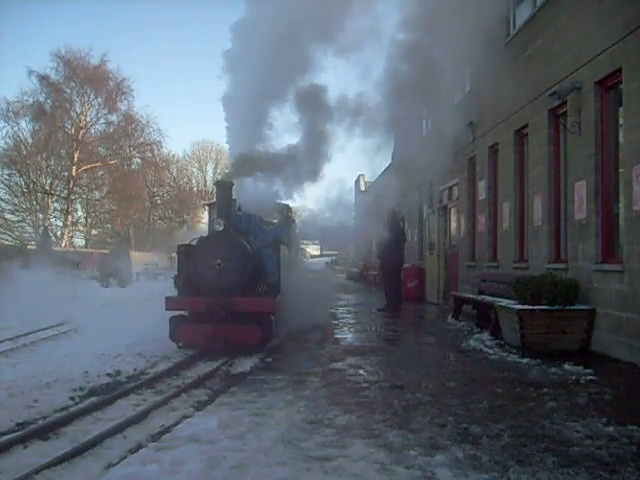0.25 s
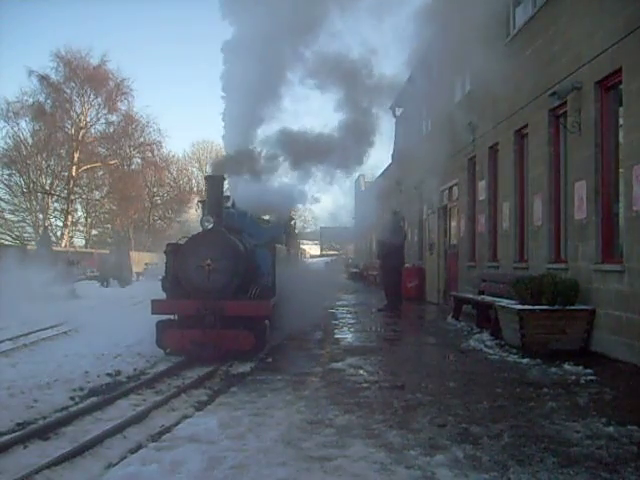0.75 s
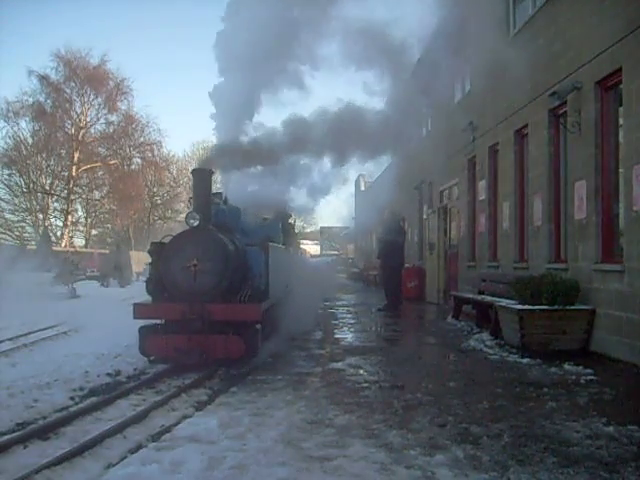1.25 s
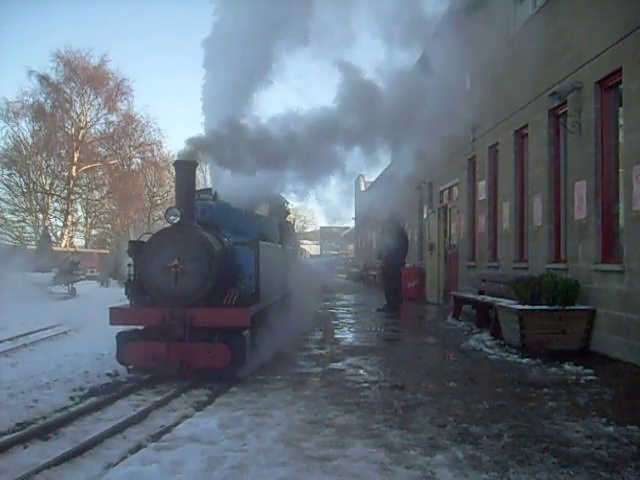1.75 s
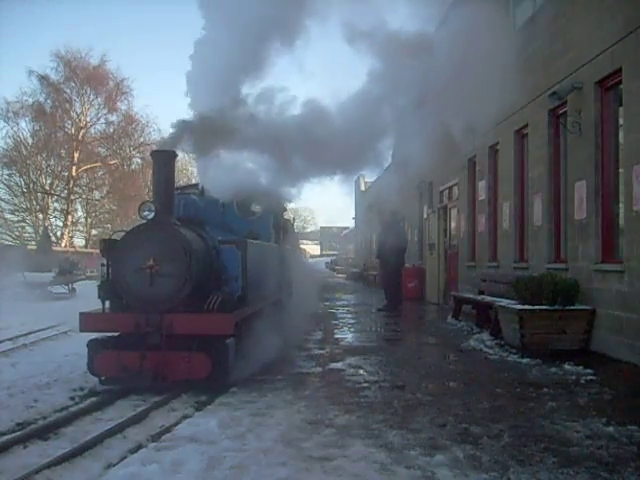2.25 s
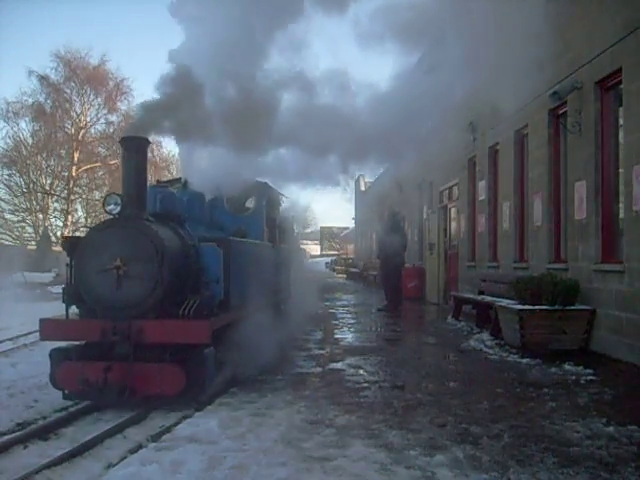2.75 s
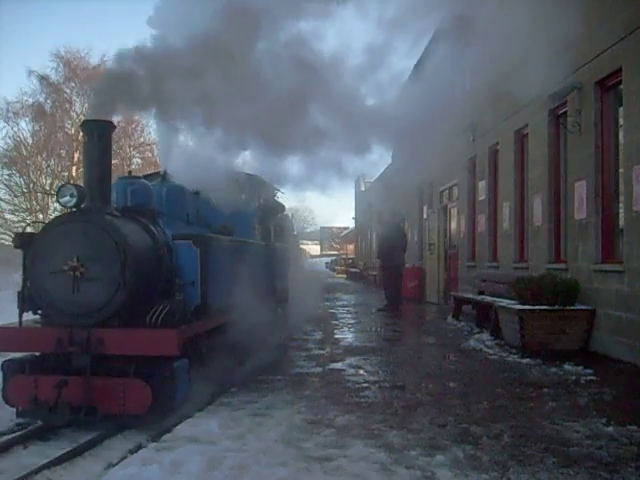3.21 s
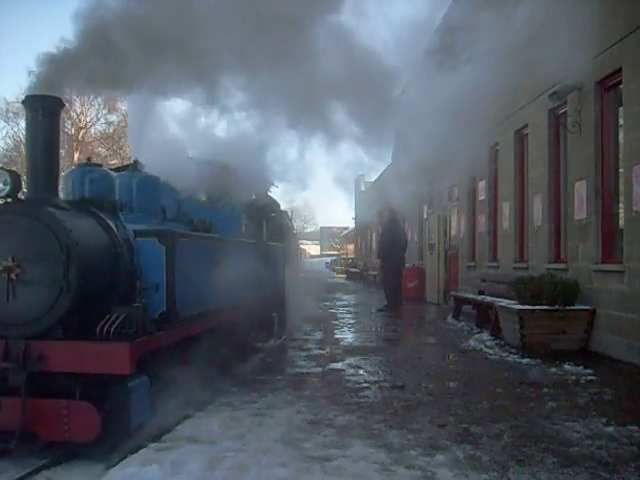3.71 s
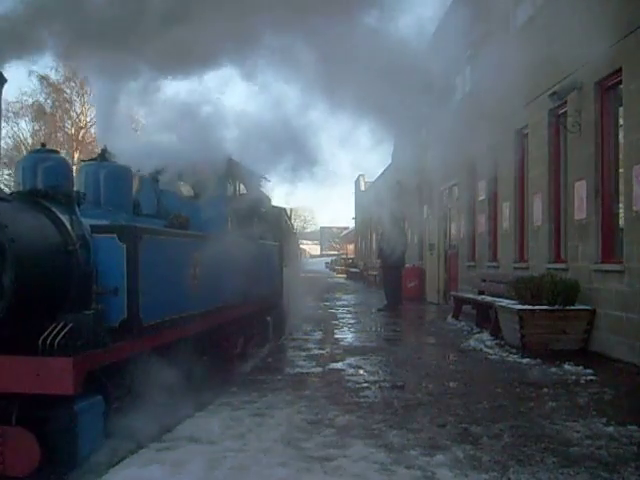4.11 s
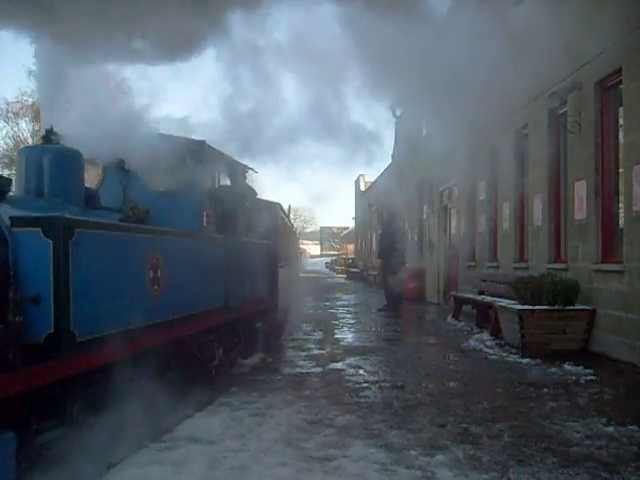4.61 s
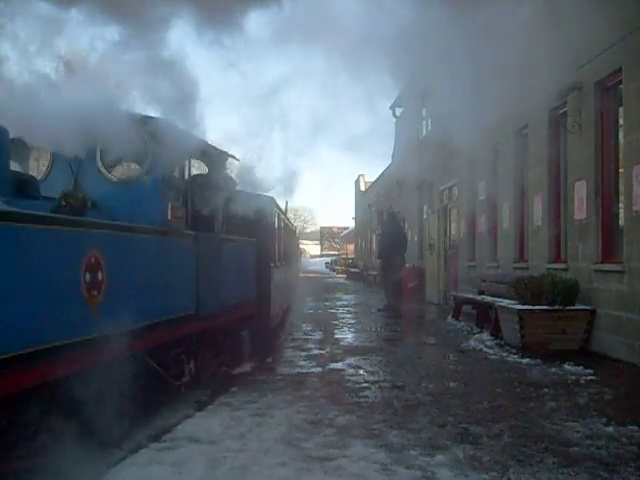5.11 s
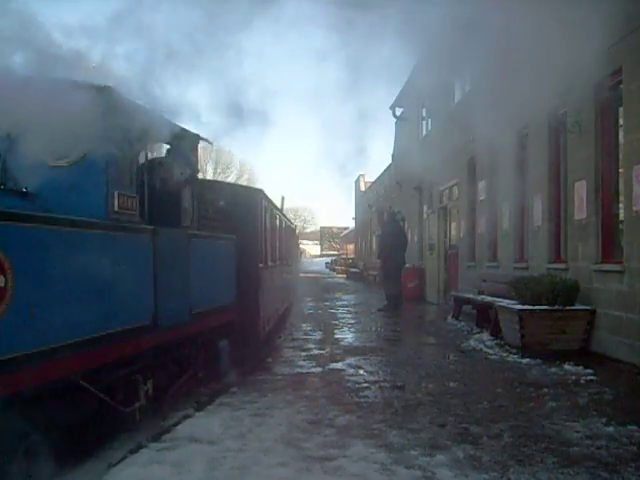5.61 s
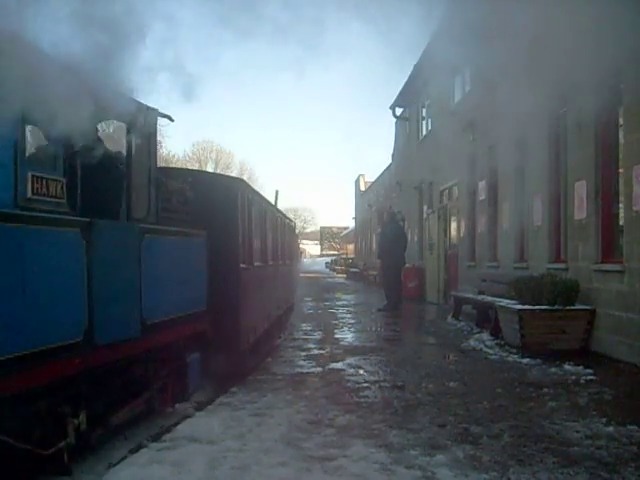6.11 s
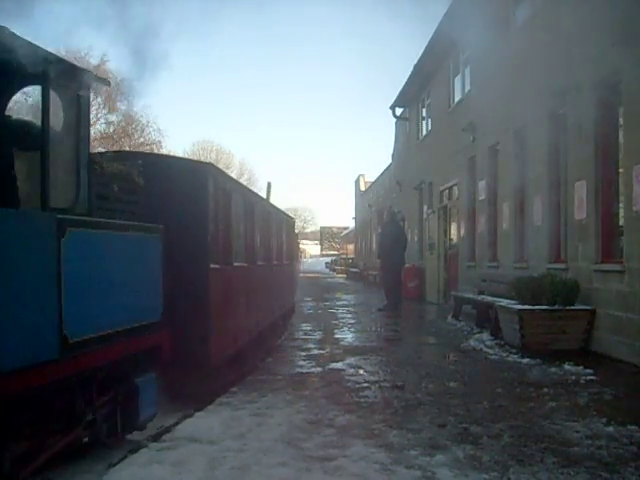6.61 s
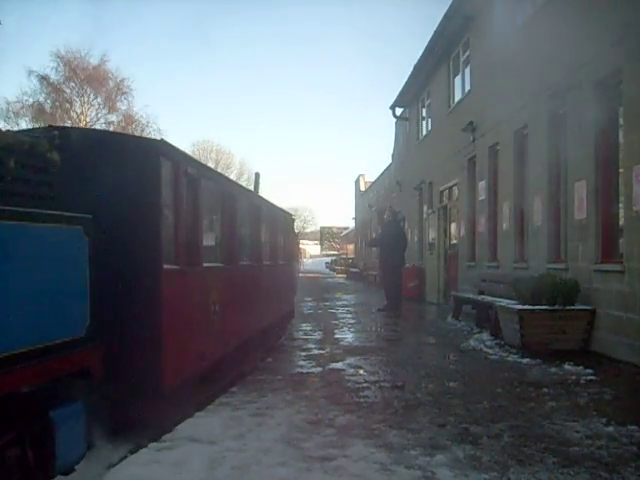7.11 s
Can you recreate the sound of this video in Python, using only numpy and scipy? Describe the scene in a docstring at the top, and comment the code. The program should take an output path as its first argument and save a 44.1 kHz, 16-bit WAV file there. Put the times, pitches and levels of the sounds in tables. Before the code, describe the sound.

Steam roars from the safety valve of a small locomotive approaching along a station platform, a bright hiss with a rough, whistle-like ring. Light spitting puffs from the drain cocks come and go. As the engine draws closer, a low rolling rumble builds beneath occasional dull knocks and an iron clank. The hiss is loudest near the end, spluttering a little as it passes a few metres from the fixed microphone, which slightly overloads.

```python
"""Steam roars from the safety valve of a small locomotive, gathering speed past a station platform.
The microphone stands 3 m from the valve's path. The jet half whistles around one strong resonance,
and its moving reflections make the hiss phase. Drain cocks puff by the cylinders; underneath, the
wheels rumble and the running gear knocks. The microphone overloads a little on the loudest hiss."""
import sys
import numpy as np
from scipy import signal
from scipy.fft import rfft, irfft, next_fast_len
from scipy.io import wavfile
from scipy.ndimage import uniform_filter1d, map_coordinates

SR = 44100
rng = np.random.default_rng(int(sys.argv[2]) if len(sys.argv) > 2 else 0)


def log_audio(samples):
    """Write samples as a 16-bit WAV file to the path given in sys.argv[1]."""
    # one column per channel
    frames = np.atleast_2d(samples).T
    # limit to full scale, then quantise
    limited = np.clip(frames, -1, 1)
    pcm = np.round(limited * 32767).astype(np.int16)
    wavfile.write(sys.argv[1], SR, pcm)


N = 324334
TIME = np.arange(N) / SR
# The valve comes abreast of the microphone at ABREAST_S, SIDE_M away and moving at SPEED_M_S.
ABREAST_S, SIDE_M, SPEED_M_S, ACCEL_M_S2 = 6.22, 3, 2.83, .24
CYLINDERS_M, WHEELS_M = 1.7, -1.2  # ahead of the valve
SOUND_M_S = 343

# Strength of the valve's blow at the microphone. Each row: time in seconds, relative level in dB.
VALVE_BLOW = [(0, -21.5), (0.38, -18), (0.85, -20.5), (1.1, -19), (1.38, -21), (1.65, -18.5), (1.85, -15),
              (2.1, -16.0), (2.6, -17), (3.1, -18.5), (3.55, -17.5), (3.85, -18), (4.2, -15.5), (5.1, -13),
              (5.45, -14), (5.8, -12.5), (7.0, -11.5), (7.35, -11.5)]
# Spectrum of the valve's jet. Each row: frequency in Hz, relative level in dB.
JET_SPECTRUM = [(300, -43), (550, -31.5), (800, -28.5), (1050, -24), (1600, -13.5), (2150, -8.5),
                (2500, -3), (2770, 0), (3000, -2), (3500, -8.5), (4400, -14.5), (5400, -22.5),
                (8000, -29.5), (12000, -64)]
# Mirror images of the jet in the platform, the track bed and two parts of the station front.
# Each row: distance from the microphone to the image's path in metres, reflection strength in dB.
JET_IMAGES = [(4.13, -20.5), (4.92, -22), (7.56, -17), (8.66, -9)]
# Puffs from the drain cocks.
# Each row: middle in seconds, length in seconds, relative hiss in dB, relative spray in dB.
COCK_PUFFS = [(.55, 0.22, -37.5, -44), (1.17, 0.32, -38, -44.5), (1.527, 0.3, -38, -51),
              (1.9, 0.45, -39, -42.5), (2.3, 0.5, -49, -39), (2.736, 0.3, -34, -36), (2.96, .3, -35, -40.5),
              (3.54, 0.29, -34, -38), (4.032, 0.24, -34.5, -38.5), (4.88, 0.14, -40, -38.5),
              (5.25, 0.16, -38, -40), (5.68, .4, -40, -40.5), (6.2, 0.18, -44, -37.5),
              (6.73, 0.19, -41, -49)]
# Spectrum of the cocks' fine spray. Each row: frequency in Hz, relative level in dB.
SPRAY_SPECTRUM = [(7000, -13), (8600, -0.5), (9500, 3), (10300, 3), (11000, -4), (12000, -18)]
# Spectrum of wheels rolling on the track. Each row: frequency in Hz, relative level in dB.
RUMBLE_SPECTRUM = [(20, -15), (35, -9), (72, 3.5), (95, -3), (175, 2.5), (260, 1), (500, -1), (1200, -30.5)]
# A brief swell of rushing steam near 1 kHz, among low groans, booms and rings.
# Each row: middle in seconds, length in seconds, level in dB, centre in Hz, width in Hz.
BRIEF_SWELLS = [(2.0, 0.28, -52.5, 284, 100), (3.42, .2, -52, 335.7, 101), (3.82, 0.2, -48, 367, 110),
                (4.35, 0.67, -43, 1001, 300), (5.9, 0.21, -52, 109.5, 130), (5.8, .6, -48.5, 650, 35),
                (6.526, 0.11, -48, 339, 100), (7.03, .3, -52, 175, 100)]
# Knocks of rods and couplings. Each row: start in seconds, relative level in dB, ring pitch in Hz.
ROD_KNOCKS = [(1.329, -36.5, 323), (1.399, -31, 298), (3.137, -32, 337), (3.667, -27.5, 334),
              (3.839, -41, 420), (4.463, -32, 428), (4.536, -36, 360), (5.747, -33, 356), (5.881, -27, 314),
              (6.103, -32, 335), (6.847, -33, 270), (6.979, -33, 331)]
# Modes of the frame. Each row: multiple of the ring pitch, relative level in dB, seconds to fall 60 dB.
FRAME_MODES = [(.55, -14.5, .12), (.88, -15, .14), (1, -1.5, 0.08), (1.24, -10, 0.08)]
# Sharp clanks of loose ironwork. Each row: start in seconds, relative level in dB.
IRON_CLANKS = [(3.14, -39), (4.46, -25.5), (4.538, -37)]


def safety_valve(tone_hz=2775, lobe_hz=4850, lobe_aim_deg=-15, lobe_spread_deg=17):
    """A turbulent jet half whistles; it grows as it nears, then dulls and splutters from behind."""
    blow_db, = curves(VALVE_BLOW)
    far, bearing = doublings(), place()[1]
    behind = np.maximum(np.sin(np.radians(bearing)), 0)
    jet = noise(JET_SPECTRUM)
    low, middle, high = below(jet, 1246), below(jet, 2145), below(jet, 3543, order=20)
    rush_db, roar_db = -38 - 3.5 * far, -25 - 5 * far
    # the bright edge follows only a share of the blow's surges
    edge_db = -26 + 0.37 * (blow_db + 12) - 1.15 * far - 3 * behind
    parts = (low, rush_db), (middle - low, roar_db), (high - middle, blow_db - 2), (jet - high, edge_db)
    steam = sum(unit(part) * undb(db + 0.59 * walk(20)) for part, db in parts)
    # the flow rings the valve's cavity, too unsteadily for a clean note
    tone = band(tone_hz + 12 * walk(6), width_hz=280) * undb(blow_db - 7.5)
    # a bright side lobe sweeps over the platform, its pitch rising with the bearing
    lobe_db = -30 - ((bearing - lobe_aim_deg) / lobe_spread_deg) ** 2
    lobe = band(lobe_hz * 2 ** (bearing / 155), width_hz=1200) * undb(lobe_db)
    splutter_db = (.5 + 1.9 * behind) * walk(380)
    return (steam + tone + lobe) * undb(splutter_db)


def reflections(jet):
    """Echo paths to the microphone change as the engine rolls, so comb notches glide through the hiss."""
    out, power, direct_m = jet, 1, place()[0]
    for image_m, db in JET_IMAGES:
        path_m = np.sqrt(direct_m ** 2 - SIDE_M ** 2 + image_m ** 2)
        delay_s = (path_m - direct_m) / SOUND_M_S
        gain = undb(db) * direct_m / path_m
        out = out + gain * map_coordinates(jet, [(TIME - delay_s) * SR], order=3)
        power = power + gain ** 2
    return out / np.sqrt(power)


def drain_cocks(hiss_hz=6250, rise_hz=2400, hiss_db=-42, spray_db=-39):
    """Wet steam puffs over a steady leak: a hiss that rises in pitch going by, with fine spray above."""
    gone_by = (1 + np.sin(np.radians(place(CYLINDERS_M)[1]))) / 2
    shade_db = gone_by ** 4  # the leak is shaded once past the microphone
    leak = undb(-4.5 * doublings(CYLINDERS_M) - shade_db)
    hiss_power, spray_power = (leak * undb(hiss_db)) ** 2, (leak * undb(spray_db)) ** 2
    for middle, length, coarse_db, fine_db in COCK_PUFFS:
        puff = swell(middle, length) * undb(-1)
        hiss_power += (puff * undb(coarse_db)) ** 2
        spray_power += (puff * undb(fine_db)) ** 2
    hiss = band(hiss_hz + rise_hz * gone_by, width_hz=1400)
    hiss *= np.sqrt(hiss_power) * undb(1.08 * walk(12))
    spray = noise(SPRAY_SPECTRUM) * np.sqrt(spray_power) * undb(1.08 * walk(9.2))
    sputter_db = 0.97 * walk(70)
    return (hiss + spray) * undb(sputter_db)


def wheels(rumble_db=-47.5, drone_db=-49, drone_hz=378):
    """Uneven rolling rumbles in the track and drones in the body; groans and a steam rush swell briefly."""
    far, body_far = doublings(WHEELS_M), doublings(CYLINDERS_M)
    rumble = noise(RUMBLE_SPECTRUM) * undb(rumble_db - 6.9 * far)
    drone = band(drone_hz - 44 * body_far, width_hz=130) * undb(drone_db - 7 * body_far)
    swells = sum(band(np.full(N, hz), width_hz) * undb(db) * swell(middle, length)
                 for middle, length, db, hz, width_hz in BRIEF_SWELLS)
    return (rumble + drone + swells) * undb(1.1 * walk(14))


def running_gear(ring_db=2, thud_db=-16):
    """Slack rods and couplings thud and ring the frame."""
    out = np.zeros(N)
    thud_noise = noise([(50, -23), (160, -2), (400, 0), (800, -21), (3000, -40)])
    for start, db, hz in ROD_KNOCKS:
        phase = 2 * np.pi * hz * (TIME - start)
        ring = sum(undb(mode_db) * decay(start, t60, rise=0.0032) * np.sin(ratio * phase)
                   for ratio, mode_db, t60 in FRAME_MODES)
        thud = thud_noise * decay(start, t60=0.33, rise=0.0031)
        out += undb(db) * (undb(ring_db) * ring + undb(thud_db) * thud)
    return out


def loose_ironwork():
    """Loose iron ticks on contact, then clanks."""
    out = np.zeros(N)
    tick_noise = noise([(100, -8), (1000, -3), (3000, 0), (6000, 0), (10000, -12), (12000, -22)])
    clank_noise = noise([(60, -12), (200, 4.5), (450, -12), (1000, 9), (4000, -8), (12000, -30)])
    for start, db in IRON_CLANKS:
        tick = 9 * tick_noise * decay(start, t60=.004, rise=.0002)
        clank = clank_noise * decay(start, t60=0.11, rise=0.0056)
        out += undb(db) * (tick + clank)
    return out


def place(ahead_m=0):
    """Metres from the microphone to a point on the engine, and its bearing in degrees (0 abreast)."""
    since = TIME - ABREAST_S
    along = ahead_m + SPEED_M_S * since + ACCEL_M_S2 * since ** 2 / 2  # negative on the approach
    return np.hypot(along, SIDE_M), np.degrees(np.arctan(along / SIDE_M))


def doublings(ahead_m=0):
    """How many times a point's distance from the microphone has doubled from its nearest."""
    return np.log2(place(ahead_m)[0] / SIDE_M)


def swell(middle, length):
    """A smooth rise and fall, above half power for length seconds."""
    return 2 ** (-2 * ((TIME - middle) / length) ** 2)


def decay(start, t60, rise):
    """Envelope of an impact: a quick rise, then a fall of 60 dB in t60 seconds."""
    age = np.maximum(TIME - start, 0)
    return (1 - np.exp(-age / rise)) * np.exp(-np.minimum(np.log(1000) * age / t60, 20))


def band(centre_hz, width_hz):
    """Noise of rms 1 in a resonance whose centre may move."""
    phase = 2 * np.pi * np.cumsum(centre_hz) / SR
    slow = [shape(rng.standard_normal(N), lambda f: (1 + (2 * f / width_hz) ** 4) ** -.5)
            for _ in range(2)]
    return unit(slow[0] * np.cos(phase) + slow[1] * np.sin(phase))


def noise(spectrum):
    """Noise of rms 1 with a spectrum of (Hz, dB) points."""
    hz, db = np.transpose(spectrum)
    return unit(shape(rng.standard_normal(N), lambda f: undb(np.interp(np.log(f), np.log(hz), db))))


def walk(rate):
    """A random drift of rms 1 that turns about rate times a second."""
    size = max(int(SR / rate), 2)
    steps = np.repeat(rng.standard_normal(N // size + 2), size)[rng.integers(size):]
    return unit(uniform_filter1d(steps, size)[:N])


def below(x, hz, order=12):
    """The part of a sound under a frequency."""
    return shape(x, lambda f: 1 / (1 + (f / hz) ** order))


def shape(x, gain):
    """Filter by a gain that is a function of frequency."""
    size = next_fast_len(N)
    hz = np.maximum(np.arange(size // 2 + 1) * SR / size, 1)
    return irfft(rfft(x, size) * gain(hz), size)[:N]


def curves(table):
    """The columns of a table, joined by straight lines in time."""
    seconds, *columns = np.transpose(table)
    return [np.interp(TIME, seconds, column) for column in columns]


def unit(x):
    """Scale to rms 1."""
    return x / np.sqrt(np.mean(x ** 2))


def undb(db):
    """Decibels to gain."""
    return 10 ** (np.asarray(db) / 20)


def scene():
    """The whole engine from one spot on the platform, in mono."""
    steam = reflections(safety_valve()) + drain_cocks()
    return (steam + wheels() + running_gear() + loose_ironwork())[None]


def record(dry, gain_db=0.51, ceiling=.7, top_hz=12100):
    """The microphone overloads and crackles on the loudest peaks of the hiss, and the top is cut."""
    clipped = np.clip(dry * undb(gain_db), -ceiling, ceiling)
    return signal.sosfiltfilt(signal.ellip(8, .1, 50, top_hz, fs=SR, output="sos"), clipped)


dry = scene()
out = record(dry)
log_audio(out)
```